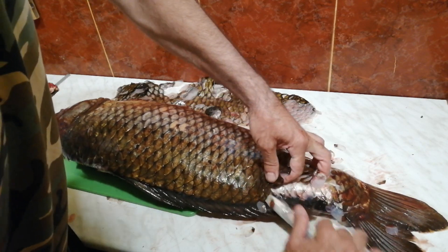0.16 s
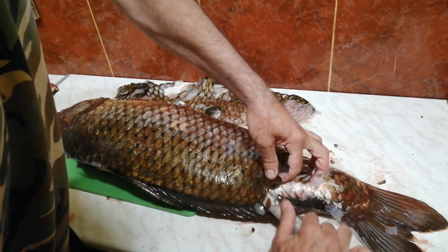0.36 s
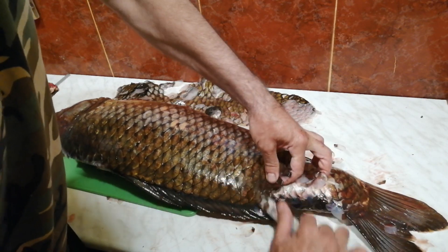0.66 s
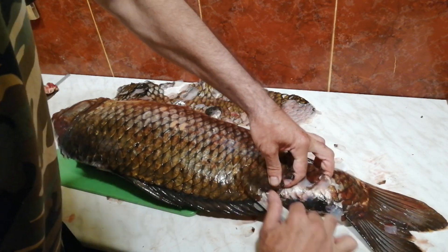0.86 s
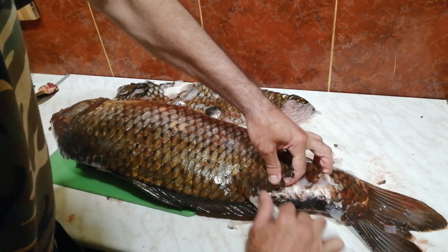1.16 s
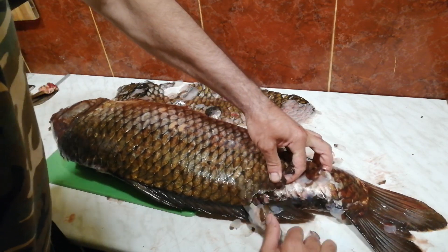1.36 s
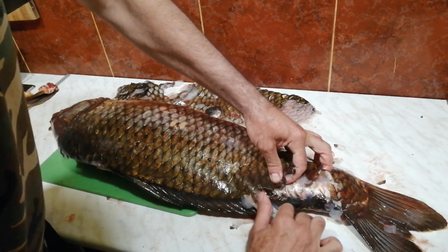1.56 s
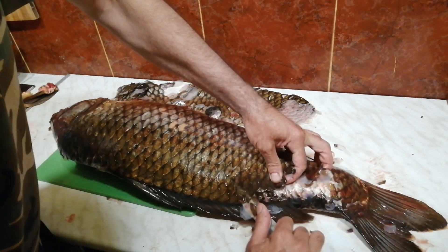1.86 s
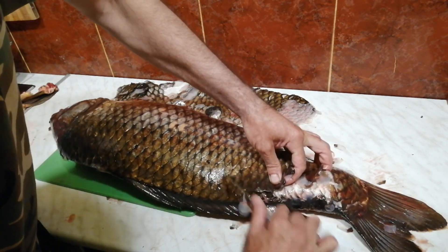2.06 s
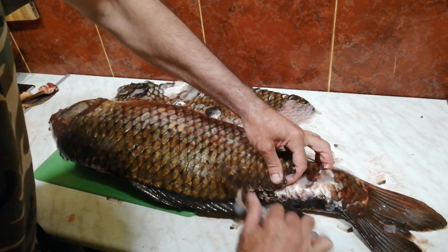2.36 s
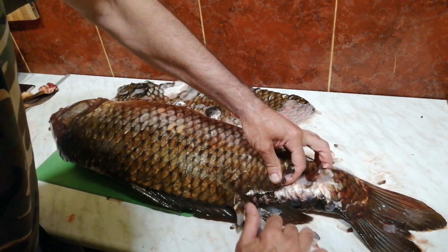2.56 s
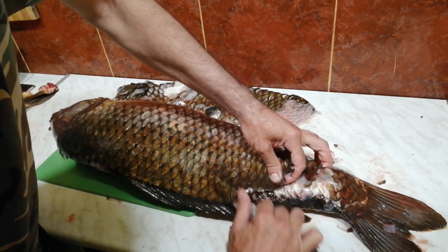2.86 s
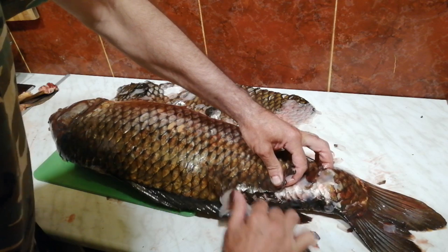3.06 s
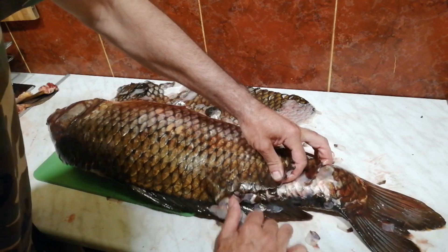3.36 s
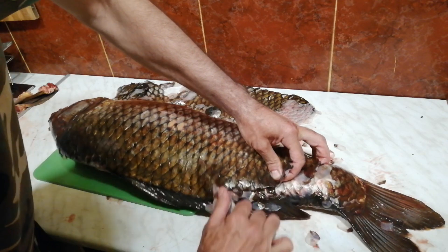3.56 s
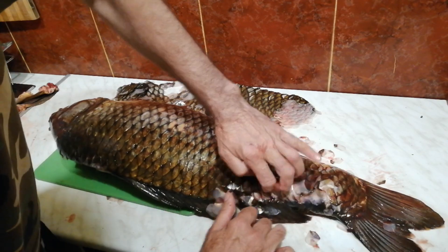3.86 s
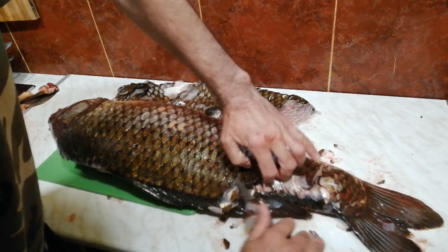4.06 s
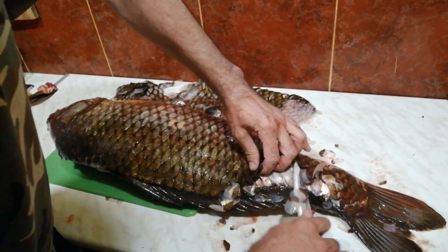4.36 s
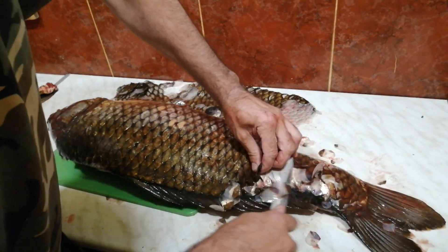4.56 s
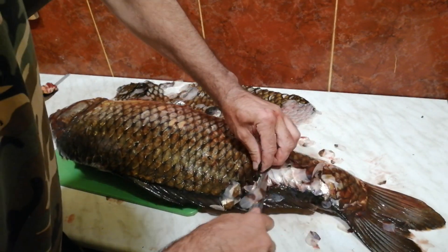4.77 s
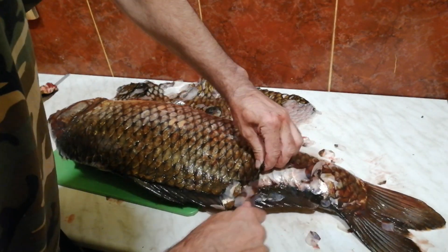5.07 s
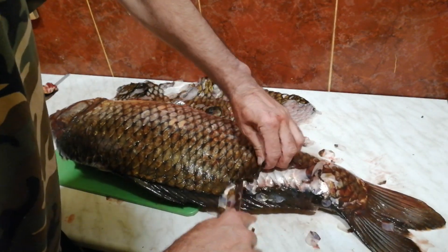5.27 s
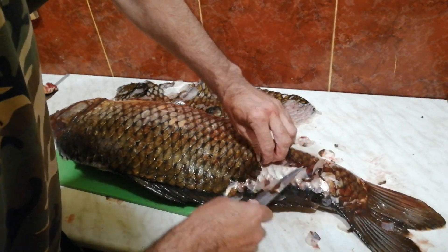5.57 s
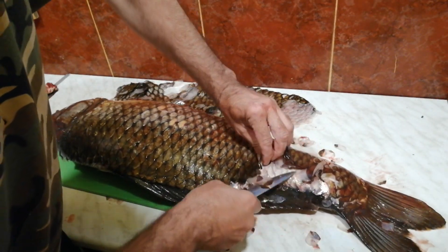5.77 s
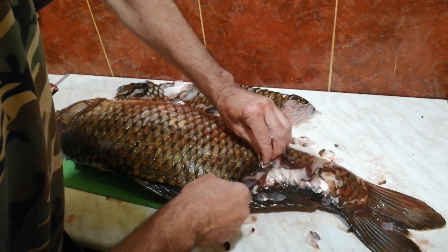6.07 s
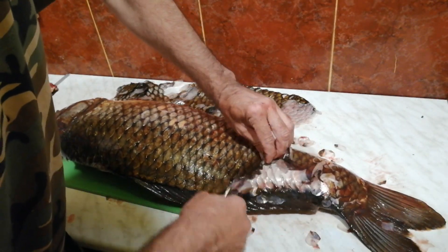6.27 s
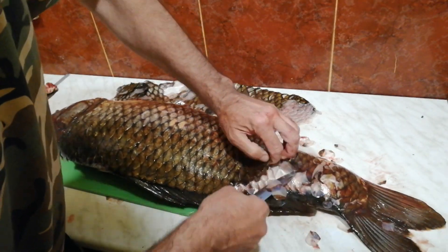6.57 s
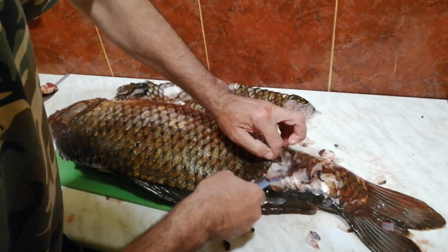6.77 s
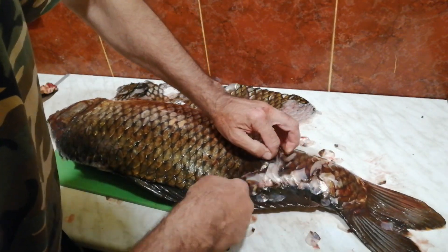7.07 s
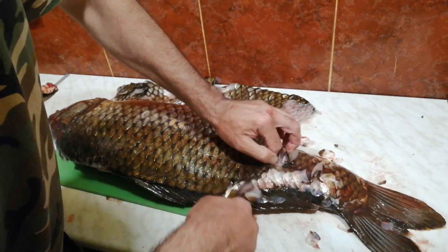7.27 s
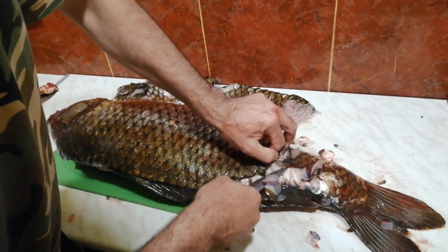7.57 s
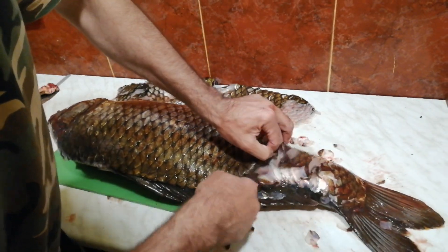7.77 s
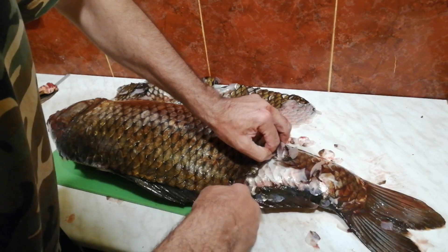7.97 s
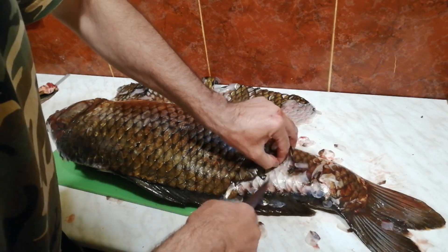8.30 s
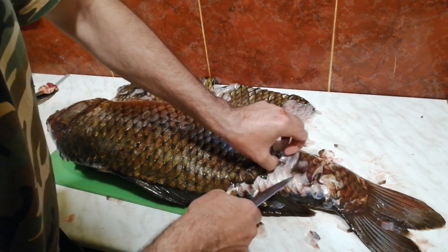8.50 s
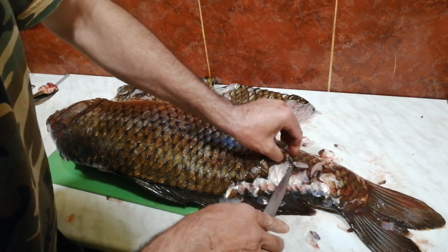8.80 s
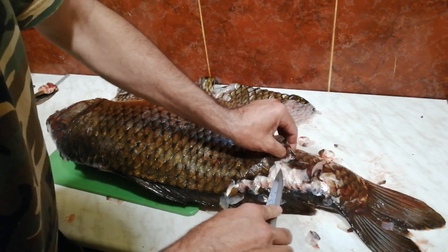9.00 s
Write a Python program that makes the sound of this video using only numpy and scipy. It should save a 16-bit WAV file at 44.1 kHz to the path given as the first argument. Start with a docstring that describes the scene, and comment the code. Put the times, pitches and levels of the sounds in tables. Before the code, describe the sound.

A brisk run of dry, rattling scrapes over fish scales, many strokes ending with a hard knock of the blade on a resonant tabletop. After about four seconds it almost stops, then resumes as isolated hissing scrapes and crisp snapping pops, with no more knocks. Tiny wet ticks, faint skin squeaks and dull soft thumps sit below. Close stereo microphones in a small, hard-walled kitchen with a quiet low hum.

```python
"""A knife scrapes the scales off a large wet fish on a kitchen table: rattling flicks, edge hiss, body noise.
Scales snap loose under each stroke as short pops with noisy cracks.
In the first quick run the knife often ends its stroke with a knock on the table, built from resonances
and ringing modes; later come single, flatter scrapes. Squeaks, thumps and wet ticks are fainter.
The tiled room answers with decaying noise, and an appliance hums far off as wavering sines."""
import sys
import numpy as np
from scipy import signal
from scipy.fft import rfft, irfft, next_fast_len
from scipy.io import wavfile
from scipy.ndimage import uniform_filter1d, minimum_filter1d, map_coordinates

SR = 44100
rng = np.random.default_rng(int(sys.argv[2]) if len(sys.argv) > 2 else 0)


def digitize_waveform(pressure):
    """Quantize a signal to 16-bit integers and store it at the path in sys.argv[1].

    Rows of a 2-D input are taken as channels; values are limited to [-1, 1].
    """
    field = np.atleast_2d(pressure).T
    bounded = np.clip(field, -1, 1)
    quanta = np.round(bounded * 32767).astype(np.int16)
    wavfile.write(sys.argv[1], SR, quanta)


N = 403074


def amp(db):
    """Decibels to amplitude ratio."""
    return 10 ** (np.asarray(db) / 20)


def unit(x):
    """Scale to an RMS of 1."""
    return x / np.sqrt(np.mean(x ** 2) + 1e-20)


def along(points, hz):
    """Interpolate (frequency [Hz], value) points on a log frequency axis."""
    f, v = np.transpose(points)
    return np.interp(np.log(hz + 1), np.log(f + 1), v)


def wobble(knots_per_s):
    """Random curve, linear between normal random knots."""
    knots = rng.standard_normal(int(N * knots_per_s / SR) + 4)
    return map_coordinates(knots, [np.arange(N) * knots_per_s / SR], order=1)


def add(track, start_s, sound):
    """Mix a sound into a track from start_s."""
    i = max(round(start_s * SR), 0)
    part = track[..., i:i + sound.shape[-1]]
    part += sound[..., :part.shape[-1]]


def filtered(x, response):
    """Apply a complex response of frequency."""
    size = x.shape[-1]
    m = next_fast_len(size + 4096)
    return irfft(rfft(x, m) * response(np.fft.rfftfreq(m, 1 / SR)), m)[..., :size]


def coloured(x, spectrum, size=4096):
    """Causal colouring that keeps the power of white noise."""
    # folded cepstrum: minimum-phase kernel
    cepstrum = irfft(np.log(amp(along(spectrum, np.fft.rfftfreq(size, 1 / SR)))))
    cepstrum[1:size // 2] *= 2
    cepstrum[size // 2 + 1:] = 0
    kernel = irfft(np.exp(rfft(cepstrum)))
    return signal.fftconvolve(x, kernel / np.linalg.norm(kernel))[:len(x)]


def close_pair(x, apart_hz=650):
    """Long waves reach both microphones nearly alike, short ones do not."""
    def turn(f):
        return np.pi / 4 * np.clip(f / apart_hz, .4, 1)

    mid, side = filtered(x, lambda f: np.array([np.cos(turn(f)), np.sin(turn(f))]))
    return np.array([mid + side, mid - side])


def crackle(slips_per_s, spread_db, smooth):
    """Tiny slips of very unequal size over a smooth rub."""
    sizes = amp(spread_db * np.minimum(rng.exponential(size=N), 3))
    slips = (rng.random(N) < slips_per_s / SR) * sizes * rng.choice([-1, 1], N)
    return unit(unit(slips) + smooth * rng.standard_normal(N))


def flicks(flicks_per_s, hz, pitch_spread, cycles, spread_db, count=9000):
    """Scales flick one by one, each with its own pitch and size."""
    t = np.arange(256) / SR
    place, keep, size = rng.random((3, count, 1))
    pitch_hz = hz * np.exp(pitch_spread * rng.standard_normal((count, 1)))
    kept = keep < flicks_per_s * N / SR / count
    gain = kept * amp(spread_db * np.minimum(-np.log(size), 3))
    age = pitch_hz * t / cycles
    waves = gain * age * np.exp(-age) * np.sin(2 * np.pi * pitch_hz * t)
    samples = (place * N).astype(int) + np.arange(256)
    return unit(np.bincount(samples.ravel(), waves.ravel(), N + 256)[:N])


def patchy(x, depth_db):
    """The colour shifts as the point of contact moves."""
    z = signal.stft(x, nperseg=256)[2]
    field = uniform_filter1d(rng.standard_normal(z.shape), size=5, axis=0)
    field = uniform_filter1d(field, size=9, axis=1)
    return unit(signal.istft(z * amp(depth_db * unit(field)), nperseg=256)[1][:N])


# knife strokes: (start [s], end [s], relative force [dB], edge hiss over scale rattle, relative [dB])
KNIFE_STROKES = [(0.223, 0.3, -45, -10), (0.334, 0.413, -39.5, -9), (0.499, .57, -50, 1.5),
                 (.68, 0.923, -42.5, -6), (.955, 1.05, -44.5, -4.5), (1.112, 1.143, -38.5, 0),
                 (1.256, 1.34, -41.5, -9.5), (1.432, 1.523, -34, -9), (1.562, 1.66, -40.5, -6),
                 (1.813, 1.87, -42.5, -6), (2.043, 2.11, -40.5, -6.5), (2.176, 2.26, -39, -6.5),
                 (2.349, 2.415, -37.5, -6), (2.473, 2.573, -41, -4.5), (2.755, 2.821, -45, -5.5),
                 (2.884, 2.981, -39, -9), (3.035, 3.135, -36.5, -7), (3.172, 3.273, -39, -8.5),
                 (3.368, 3.51, -44, -6), (3.559, 3.641, -42.5, -4.5), (3.725, 4.088, -60.5, 2),
                 (5.185, 5.209, -46.5, 4), (5.209, 5.225, -37, 2.5), (5.278, 5.292, -35, -0.5),
                 (5.434, 5.509, -57.5, 8.5), (5.783, 5.863, -55, 1), (6.215, 6.336, -43, 3),
                 (6.359, 6.436, -40, -2), (6.61, 6.689, -67, 11.5), (6.865, 7.052, -65, 7),
                 (7.086, 7.15, -35.5, -10.5), (7.225, 7.287, -34.5, -8), (7.33, 7.369, -43.5, -15.5),
                 (7.558, 7.904, -58.5, -9.5), (7.975, 8.082, -38.5, -7.5), (8.158, 8.231, -36.5, -7),
                 (8.343, 8.432, -48, -9), (8.56, 8.804, -57, -5.5), (8.828, 8.888, -46, -6.5)]
# fish body under a stroke: (time [s], relative level over force [dB])
FISH_BODY_LEVEL = [(0, -16), (2.2, -16), (2.45, -4.5), (2.9, -10.5), (3.6, -3), (5.2, -5), (7.2, -8),
                   (9, -6.5)]
# spectrum of rattling scales: (frequency [Hz], relative density [dB per Hz])
RATTLE_SPECTRUM = [(700, -41.5), (1400, -27.5), (1950, -2), (2350, -7), (2800, 4.5), (3400, -11.5),
                   (5000, -17.5), (9000, -77)]
# spectrum of edge hiss and tearing: (frequency [Hz], relative density [dB per Hz])
HISS_SPECTRUM = [(700, -19), (1400, -10.5), (2200, -6), (3800, 3), (5500, 3), (7600, 0), (8400, -3),
                 (10000, -3), (11700, -12.5), (15000, -19), (16500, -33)]
# spectrum of the fish body: (frequency [Hz], relative density [dB per Hz])
BODY_SPECTRUM = [(60, -26.5), (150, -8.5), (350, -9), (600, -5.5), (1300, -7), (2000, 0.5), (3500, -38.5)]


def scrapes(rise_share=0.16, fall_s=0.0048, rattle_db=-6.0, hiss_db=-3.5, body_db=-1):
    """The edge drags over rows of scales: they rattle near 2.6 kHz, the edge hisses, the fish sounds below."""
    t = np.arange(N) / SR
    force = np.zeros((3, N))  # rattle, hiss, body
    for start, end, force_db, edge_db in KNIFE_STROKES:
        levels_db = force_db + np.array([0, edge_db, np.interp(start, *np.transpose(FISH_BODY_LEVEL))])
        # longer strokes build up more gently, up to 0.08 s
        rise_s = rise_share * min(end - start, .08)
        press = .5 + .5 * np.tanh((t - start) / rise_s)
        release = np.exp(-np.maximum(t - end, 0) / fall_s)
        force += amp(levels_db)[:, None] * press * release
    # the edge catches and lets go
    force *= amp(3 * wobble(knots_per_s=90) + .8)

    scales = flicks(flicks_per_s=850, hz=2600, pitch_spread=.19, cycles=1.2, spread_db=4)
    rattle = force[0] * unit(scales + coloured(rng.standard_normal(N), RATTLE_SPECTRUM))
    slips = crackle(slips_per_s=520, spread_db=6.5, smooth=.5)
    hiss = force[1] * patchy(coloured(slips, HISS_SPECTRUM), depth_db=4)
    body = coloured(force[2] * slips, BODY_SPECTRUM)
    return amp(rattle_db) * rattle + amp(hiss_db) * hiss + amp(body_db) * body


# small scales snap at random under the edge, louder the harder it presses
SMALL_PER_S, SMALL_HZ, SMALL_PITCH_SPREAD = 22, 2580, 0.061
# relative: pop over force, crack over hiss, scatter from scale to scale
SMALL_POP_DB, SMALL_CRACK_DB, SMALL_SCATTER_DB = 1.5, 3, 2.5


def small_snaps(count=12):
    """Rows like LARGE_SNAPS for the small scales that each stroke lifts along its way."""
    rows = []
    for start, end, force_db, hiss_db in KNIFE_STROKES:
        times = start + (np.arange(count) + rng.random(count)) / SMALL_PER_S
        for s, (pitch, size, tear) in zip(times, rng.standard_normal((count, 3))):
            if s < end:
                hz = SMALL_HZ * np.exp(SMALL_PITCH_SPREAD * pitch)
                pop_db = force_db + SMALL_POP_DB + SMALL_SCATTER_DB * size
                crack_over_db = hiss_db + SMALL_CRACK_DB - SMALL_POP_DB + SMALL_SCATTER_DB * tear
                rows.append((s, hz, pop_db, crack_over_db))
    return rows


# large scales snapping loose: (time [s], pitch [Hz], relative pop level [dB], relative crack over pop [dB])
LARGE_SNAPS = [(.092, 3370, -30.5, 0), (.218, 3100, -39.5, 9.5), (.228, 2970, -26, -4),
               (0.563, 2710, -29, -17), (.82, 2850, -33.5, -2.5), (.878, 2150, -32, -1.5),
               (1.295, 2440, -26, -19.5), (1.468, 2330, -28, 2), (1.946, 2570, -34.5, -19),
               (2.541, 2500, -30.5, -1.5), (2.943, 2620, -36.5, -7.5), (3.21, 2180, -31, -5),
               (3.614, 2830, -32, 2), (3.65, 2360, -51, 13.5), (3.785, 2420, -27.5, -17),
               (4.317, 2650, -47, -13.5), (4.36, 3440, -48.5, 1.5), (5.041, 3250, -44, -3.5),
               (5.21, 2830, -24.5, -2.5), (5.286, 2070, -32.5, -3.5), (5.372, 2450, -24.5, -1.5),
               (5.504, 2860, -37.5, -9), (5.787, 3100, -38, 2.5), (6.251, 2620, -37.5, 4.5),
               (6.363, 2860, -29.5, -13), (6.917, 2630, -46, 1), (7.059, 2030, -42.5, 12.5),
               (7.103, 2050, -27, -10), (7.119, 2740, -21, -12.5), (7.226, 2800, -16, -12.5),
               (7.245, 2730, -30, -3), (7.56, 2450, -33.5, -16.5), (7.737, 2070, -37, -22),
               (7.843, 2830, -45, 1), (7.934, 2310, -33, -4.5), (7.983, 2370, -31, -7),
               (8.174, 2550, -28.5, -21), (8.338, 2690, -39, -17.5)]


def snaps(crack_t60_s=0.015, crack_rise_s=0.00047, pop_gain_db=10, crack_gain_db=7,
          peel_gain_db=-17, peel_s=0.0086, flesh_db=-13):
    """A scale peels, tears out with a crack and flicks back with a dry pop of a few cycles."""
    t = np.arange(SR // 25) / SR
    pops, tearing = np.zeros(N), np.zeros(N)
    for s, hz, pop_db, crack_over_db in LARGE_SNAPS + small_snaps():
        crack_db = pop_db + crack_over_db
        age = hz * t / 1.15
        pop = 2 * age * np.exp(-age) * np.sin(2 * np.pi * hz * t)
        add(pops, s - .0011, amp(pop_db + pop_gain_db) * pop)
        crack = amp(crack_db + crack_gain_db - 60 * t / crack_t60_s) * (1 - np.exp(-t / crack_rise_s))
        add(tearing, s - .001, crack)
        # peeling swells and fades around the crack
        peel = amp(crack_db + peel_gain_db) * np.exp(-np.abs(t - t.mean()) / peel_s)
        add(tearing, s - t.mean(), peel)
    tear = tearing * rng.standard_normal(N)
    flesh = coloured(tear, BODY_SPECTRUM)  # the tug also shakes the fish
    return pops + coloured(tear, HISS_SPECTRUM) + amp(flesh_db) * flesh


# broad resonances of the knock: (frequency [Hz], width [Hz], relative level [dB])
KNOCK_RESONANCES = [(219.2, 30.4, -20.5), (349.4, 51, -10.5), (508, 77, -8.5), (554, 180, -15.5),
                    (790, 224, -0.5), (995, 210, -3.5), (1194, 37, 0), (1556, 48, -5), (1840, 100, -11.5),
                    (2217, 77, -15), (2710, 510, -21.5)]


def knock_tone(f, spot):
    """Sum of broad resonances with alternating sign, weighted by the spot struck."""
    total = 0
    for k, (centre, width, db) in enumerate(KNOCK_RESONANCES):
        band = 1j * f * width / (centre * centre - f * f + 1j * f * width)
        total = total + (-1) ** k * spot[k] * amp(db) * band
    return total


def ring(modes, t, phases, scatter_db):
    """Decaying modes, at new strengths for every blow."""
    hz, db, t60_s = np.transpose(modes)[..., None]
    level_db = db + scatter_db * rng.standard_normal(db.shape) - 60 * t / t60_s
    return np.sum(amp(level_db) * np.sin(2 * np.pi * hz * t + phases), axis=-2)


# knife meets table: (time [s], relative blow level [dB], relative level of its hard part [dB])
TABLE_KNOCKS = [(0.0, -18, -15), (0.283, -12.5, -9), (0.926, -10, 0.5), (1.156, -7.5, -1), (1.435, -6, 1),
                (1.702, -2, -5.5), (1.814, -6.5, -13.5), (2.349, -2.5, -13.5), (2.639, -1, -4.5),
                (2.817, -3, -15.5), (3.088, -8, -9.5), (3.355, -2, -3.5), (3.723, -3.5, -6)]
# ringing of the table top: (frequency [Hz], relative level [dB], t60 [s])
TABLE_MODES = [(218, -15, .3), (345, -9, .25), (402, -9, .25), (441, -10, .2), (567, -8, .26),
               (641, -4, .21), (746, -3, .25), (797, -2, .22), (850, 3, .22), (933, 1, .23), (1002, -2, .2),
               (1168, -6, .18), (1249, -8, .2), (1490, -7, .2), (1560, -6, .17), (1819, -8, .19),
               (1900, -9, .17), (2018, -10, .2), (2160, -10, .18), (2482, -16, .2), (2713, -14, .17)]
# close modes of the table: (frequency [Hz], relative density [dB per Hz])
DENSE_MODES = [(120, -27), (230, -8), (340, -1.5), (550, -3), (850, 2.5), (1300, -4.5), (1600, -4.5),
               (2400, -11.5), (3200, -26), (6000, -50), (16000, -70)]


def knocks(travel=.115, contact_db=3.5, wave_db=0, split_hz=1200, soft_hz=2800, ring_rise_s=0.0028,
           hard_share=.7, lead_s=0.001296, spot_db=3.5, dense_db=-16.5, dense_t60_s=.16):
    """A blow on the table top: contact sounds first, slower bending waves follow, then the top rings on."""
    t = np.arange(SR // 2) / SR

    def lows(f):
        return 1 / (1 + 1j * f / split_hz)

    def bending(f):
        return np.exp(-4j * np.pi * travel * np.sqrt(f))  # delay [s] = travel / sqrt(f)

    def soft(f):  # a cushioned blow has little treble
        return 1 / (1 + 1j * f / soft_hz - (f / soft_hz) ** 2) ** 2

    def paths(f):
        return amp(contact_db) * (1 - lows(f)) ** 2 + amp(wave_db) * lows(f) ** 2 * bending(f)

    # each microphone hears the higher modes in its own phase
    hz = np.transpose(TABLE_MODES)[0][:, None]
    apart = rng.uniform(-1.8, 1, (2,) + hz.shape) * np.minimum(hz / 550, np.pi)
    phases = rng.uniform(0, 2 * np.pi, hz.shape) + apart
    usual_db = np.mean([row[2] for row in TABLE_KNOCKS])
    rise = 1 - np.exp(-t / ring_rise_s)
    track = np.zeros((2, N))
    for s, blow_db, hard_db in TABLE_KNOCKS:
        # each spot favours other resonances
        spot = amp(spot_db * rng.standard_normal((len(KNOCK_RESONANCES), 2, 1)))
        left, right = filtered(1. * (t == 0), lambda f: knock_tone(f, spot) * paths(f) * soft(f))
        blow = unit(np.array([np.roll(left, 2), right])) / 20
        rings = amp(-33) * ring(TABLE_MODES, t, phases, scatter_db=2.5) * rise
        # countless close modes between the strong ones blur into a short noisy decay
        noise = rng.standard_normal((2, len(t)))
        dense = unit(close_pair(filtered(noise, lambda f: amp(along(DENSE_MODES, f)))))
        rings = rings + amp(dense_db - 60 * t / dense_t60_s) * rise * dense

        def hardness(f):  # treble shelf
            return amp(hard_share * (hard_db - usual_db) * f * f / (f * f + 1200 ** 2))

        add(track, s - lead_s, amp(blow_db - 0.97) * filtered(blow + rings, hardness))
    return track


def crunches(lead_db=-29, lead_s=.004, crunch_db=-28, crunch_s=0.0054):
    """Around each knock the edge runs through skin; just after it, scales are crushed under the edge."""
    t = np.arange(N) / SR
    skin, crush = np.zeros((2, N))
    for s, blow_db, hard_db in TABLE_KNOCKS:
        away_s = np.abs(t - s)
        skin += amp(blow_db + lead_db) * np.exp(-away_s / lead_s)
        crush += amp(blow_db + hard_db + crunch_db) * (t > s) * np.exp(-away_s / crunch_s)
    skin_noise = coloured(skin * rng.standard_normal(N), BODY_SPECTRUM)
    return skin_noise + coloured(crush * rng.standard_normal(N), HISS_SPECTRUM)


# gliding squeaks on the blade, first a scale's swelling pop, then wet skin: (start [s], end [s], from pitch
# [Hz], to pitch [Hz], relative level [dB])
BLADE_SQUEAKS = [(0.555, 0.564, 2900, 2700, -28), (6.798, 6.818, 2180, 2116, -44),
                 (6.809, 6.841, 3240, 2530, -48.5), (6.866, 6.908, 5370, 5000, -51.5),
                 (8.585, 8.615, 2283, 2860, -50), (8.671, 8.686, 1850, 1680, -58),
                 (8.705, 8.72, 2830, 2530, -52.5), (8.849, 8.877, 3370, 4850, -44.5)]


def squeaks(overtone_db=-11):
    """A scale near the start pops with a swelling squeak; later, wet skin sticks and slips on the steel: short,
    rough, gliding squeaks."""
    track = np.zeros(N)
    for start, end, from_hz, to_hz, db in BLADE_SQUEAKS:
        size = max(round((end - start) * SR), 64)
        roughness = 1 + .055 * wobble(knots_per_s=1500)[:size]
        pitch_hz = np.geomspace(from_hz, to_hz, size) * roughness
        phase = 2 * np.pi * np.cumsum(pitch_hz) / SR
        tone = sum(amp(k * overtone_db) * np.sin((k + 1) * phase)
                   for k in range(3) if (k + 1) * from_hz < 7000)
        add(track, start, amp(db) * unit(tone) * np.sin(np.linspace(0, np.pi, size)))
    return track


# fish shifting softly on the board: (time [s], pitch [Hz], relative level [dB])
FISH_BUMPS = [(2.183, 488, -33.5), (5.282, 170, -47.5), (5.943, 399, -41.5), (7.226, 151, -36.5),
              (7.933, 396, -35), (8.0, 420, -41.5)]


def bumps(t60_s=0.025, rise_s=0.0026, squish=0.38):
    """Soft flesh gives a dull, short thump."""
    t, track = np.arange(SR // 5) / SR, np.zeros(N)
    for s, hz, db in FISH_BUMPS:
        flesh = np.sin(2 * np.pi * hz * t) + squish * coloured(rng.standard_normal(len(t)), BODY_SPECTRUM)
        add(track, s, amp(db + 9 - 60 * t / t60_s) * (1 - np.exp(-t / rise_s)) * flesh)
    return track


def wet_ticks():
    """Slimy scales tick faintly under the fingers all the while."""
    return amp(-75) * coloured(crackle(slips_per_s=22, spread_db=4, smooth=0), HISS_SPECTRUM)


# decay of the room: (frequency [Hz], t60 [s])
ROOM_DECAY = [(150, 0.64), (400, 0.28), (1000, 0.3), (2800, 0.23), (7000, .28), (15000, 0.22)]


def kitchen(x, build_s=0.00119, count=30):
    """Tiled walls answer with decaying noise, redrawn for each of count segments as the hands move."""
    out = np.zeros((2, N))
    edges = np.linspace(0, N, count + 1).astype(int)
    for a, b in zip(edges, edges[1:]):
        hz, t, z = signal.stft(rng.standard_normal((2, SR // 2)), SR, nperseg=256)
        decay = amp(-60 * t / along(ROOM_DECAY, hz)[:, None])
        tail = signal.istft(z * decay, SR, nperseg=256)[1]
        tail *= 1 - np.exp(-np.arange(tail.shape[1]) / SR / build_s)
        add(out, a / SR, signal.fftconvolve(x[None, a:b], tail / np.linalg.norm(tail[0]), axes=1))
    return close_pair(out)


# spectrum of the room noise: (frequency [Hz], relative density [dB per Hz])
FLOOR_SPECTRUM = [(12, -35), (20, -25.5), (101, -15.5), (163, -15.5), (204, -11), (228, -15), (301, -17),
                  (367, -15), (459, -14), (513, -19), (624, -20.5), (849, -23), (2260, -25), (16000, -44.5)]
# spectrum of the low drone: (frequency [Hz], relative density [dB per Hz])
DRONE_SPECTRUM = [(15, -37.5), (28, 9.5), (40, 4.5), (51, -8), (66, 11), (150, -69.5)]
# lines of the appliance: (frequency [Hz], level before wavering and fade [dB])
HUM_LINES = [(49.5, -60), (100.3, -65), (199.6, -62), (300.8, -66), (641, -73)]


def background(floor_db=-57, rumble_db=-63, fade_db_per_s=0.67):
    """Room noise, a low drone and the wavering hum of an appliance, whose overtones slowly fade."""
    t = np.arange(N) / SR

    def noise(spectrum):
        white = rng.standard_normal((2, N))
        return unit(close_pair(filtered(white, lambda f: amp(along(spectrum, f)))))

    fade_db = fade_db_per_s * (t.mean() - t)
    hum = np.zeros(N)
    for hz, db in HUM_LINES:
        level_db = db + 3.2 * wobble(knots_per_s=3.5) + fade_db * (hz > 150)
        phase = 2 * np.pi * hz * t + 1.4 * wobble(knots_per_s=4.2)
        hum += np.sqrt(2) * amp(level_db) * np.sin(phase)
    floor = filtered(noise(FLOOR_SPECTRUM), lambda f: 1 / (1 + (f / 13500) ** 8))
    return amp(floor_db) * floor + amp(rumble_db) * noise(DRONE_SPECTRUM) + hum


def scene():
    """Fish and table, direct and answered by the room, over the background."""
    fish = scrapes() + snaps() + squeaks() + bumps() + crunches() + wet_ticks()
    table = knocks()
    near = np.array([np.roll(fish, 1), fish])  # left one sample later
    sources = amp(1.5) * near + kitchen(fish) + table + amp(-2.5) * kitchen(table[0])
    return sources * amp([[-.4], [.4]]) + background()


TOP_HZ = 16000


def record(dry):
    """A fast limiter holds peaks to full scale, then everything from TOP_HZ up is cut."""
    needed = np.minimum(1, 1 / (np.abs(dry).max(axis=0) + 1e-9))
    gain = uniform_filter1d(minimum_filter1d(needed, size=129), size=129)
    return filtered(dry * gain, lambda hz: hz < TOP_HZ)


dry = scene()
out = record(dry)
digitize_waveform(out)
```